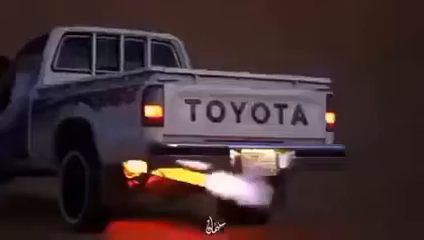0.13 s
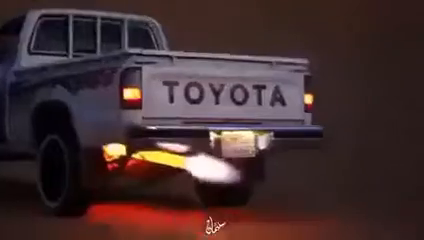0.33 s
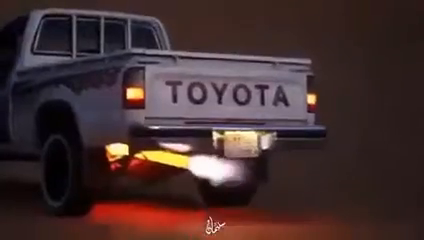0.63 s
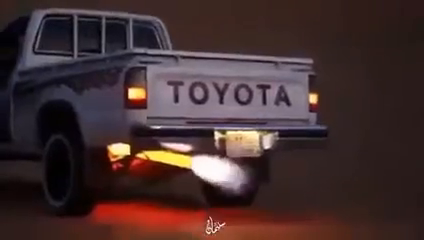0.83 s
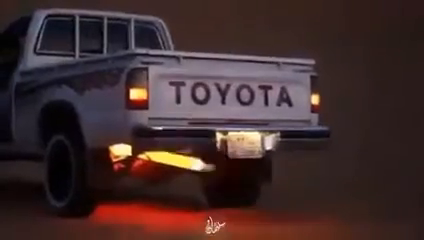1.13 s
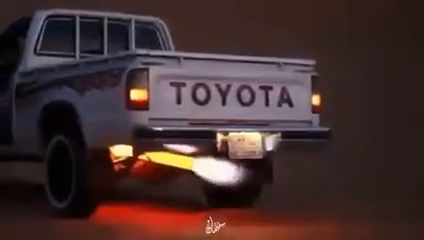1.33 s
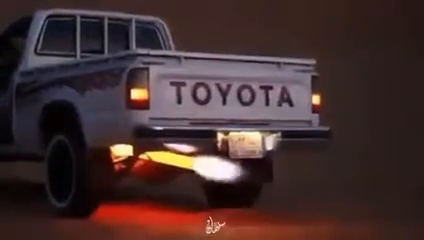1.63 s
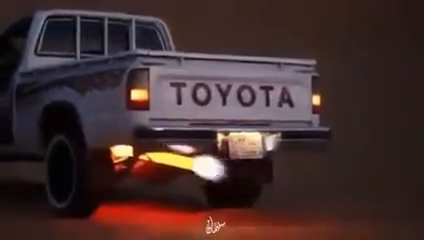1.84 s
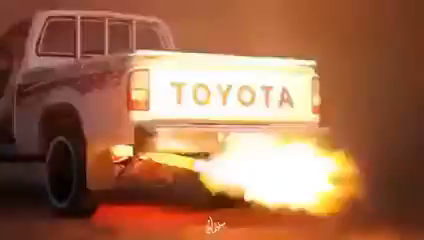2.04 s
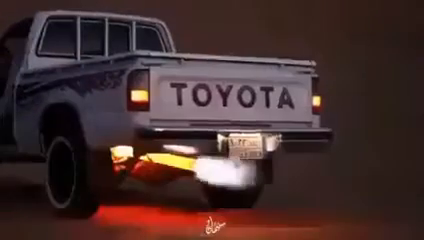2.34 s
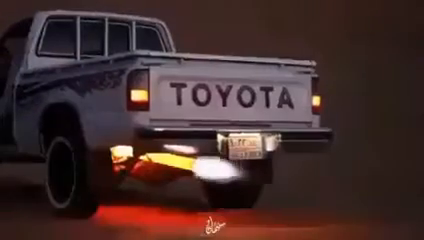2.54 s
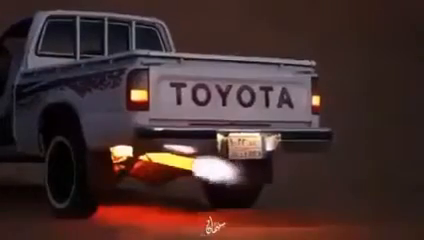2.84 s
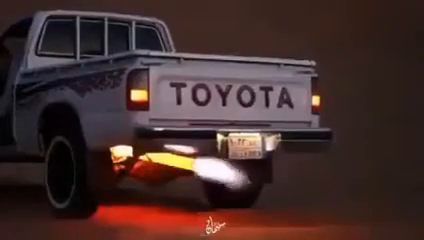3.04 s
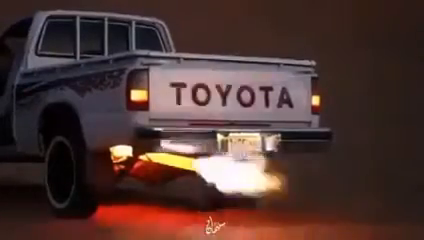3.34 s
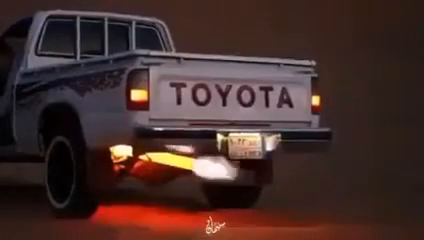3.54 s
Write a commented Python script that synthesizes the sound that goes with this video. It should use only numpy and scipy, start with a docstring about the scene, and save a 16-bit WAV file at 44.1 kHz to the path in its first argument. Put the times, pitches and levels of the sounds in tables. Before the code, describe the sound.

A pickup engine bounces off its rev limiter, cutting in abruptly at 0.2 s after silence. Hollow, pipe-ringing pops and sharp cracks come irregularly, roughly forty per second, over buzzing firings, sputtering hiss and low rumble. From 1.7 to 2.1 s a raspy flame howl slides down, with a short muffled burst at 2.0. Dense popping resumes, briefly thinning near 3.2, until 3.66. Close, outdoors, faint reflections, peaks slightly saturated.

```python
"""A pickup's four-cylinder engine bounces off its rev limiter outdoors: uneven firings ring the exhaust pipe.
Each firing adds a spit of turbulent gas, over a sputtering hiss that rises and falls and a crank hum.
Sharp pops of unburnt fuel ring the same pipe and crack; the engine dips just before each one.
Midway the tailpipe flame howls down in pitch, a modulated harmonic tone, and bursts in a puff of noise.
Filtered crank pulses add a rasp, low noise a rumble throughout; near echoes and a faint tail surround it all."""
import sys
import numpy as np
from scipy import signal
from scipy.fft import rfft, irfft
from scipy.io import wavfile
from scipy.ndimage import map_coordinates

SR = 44100
rng = np.random.default_rng(int(sys.argv[2]) if len(sys.argv) > 2 else 0)


def wav_out(sig):
    """Save sig, one row per channel (or a flat mono array), as 16-bit PCM at SR to the path in sys.argv[1]."""
    wavfile.write(sys.argv[1], SR, np.round(np.clip(np.atleast_2d(sig).T, -1, 1) * 32767).astype(np.int16))


N = 161847
T = np.arange(N) / SR


def amp(db):
    """Level law: decibels to a pressure gain."""
    return 10 ** (np.asarray(db) / 20)


def unit(x):
    """Normalisation to an effective (rms) value of 1."""
    return x / np.sqrt(np.mean(x ** 2) + 1e-20)


def curve(rows, axis=1):
    """Linear interpolation of one table column over time."""
    rows = np.array(rows)
    return np.interp(T, rows[:, 0], rows[:, axis])


def wander(hz):
    """Slow random fluctuation: noise under a Gaussian low-pass, rms 1."""
    hz_axis = np.fft.rfftfreq(N, 1 / SR)
    spectrum = rfft(rng.standard_normal(N))
    return unit(irfft(spectrum * np.exp(-(hz_axis / hz) ** 2), N))


def lowpass(x, hz):
    """Second-order low-pass: fast changes of pressure are smoothed."""
    return signal.sosfilt(signal.butter(2, hz, fs=SR, output="sos"), x)


def highpass(x, hz, order):
    """High-pass: slow changes of pressure are removed."""
    return signal.sosfilt(signal.butter(order, hz, "high", fs=SR, output="sos"), x)


def response(points, peaks=(), size=8192):
    """Minimum phase: the causal impulse response, of energy 1, of a spectrum with resonances."""
    hz = abs(np.fft.fftfreq(size, 1 / SR))
    point_hz, point_db = np.transpose(points)
    db = np.interp(np.log(hz + 1), np.log(point_hz + 1), point_db)
    for centre, width, lift in peaks:
        db = db + lift / (1 + (2 * (hz - centre) / width) ** 2)
    # the Hilbert transform of the log magnitude gives the phase
    log_spectrum = np.conj(signal.hilbert(np.log(amp(db))))
    h = np.fft.ifft(np.exp(log_spectrum)).real[:size // 2]
    return h / np.linalg.norm(h)


def through(x, h):
    """Convolution: a linear system answers every sample with its impulse response."""
    return signal.fftconvolve(x, h)[:N]


def coloured_noise(points):
    """Filtered white noise: a random source takes the given spectrum."""
    return through(rng.standard_normal(N), response(points))


def clicks(times, sizes):
    """Impulse train: one single-sample impulse at each time."""
    samples = np.round(np.asarray(times) * SR).astype(int)
    return np.bincount(np.clip(samples, 0, N), sizes, N + 1)[:N]


# near reflections from ground and bodywork: delay_s, gain
NEAR_ECHOES = [(.0051, 0.059), (.0073, 0.042)]
YARD_T60, YARD_DB = .25, -18  # decay time of the scattered tail (s), its level (dB)


def outdoors(x):
    """Reflection and scattering: discrete early echoes and an exponentially decaying tail."""
    onset = np.minimum(T / 0.0038, 1)
    tail = rng.standard_normal(N) * amp(-60 * T / YARD_T60) * onset
    tail = amp(YARD_DB) * tail / np.linalg.norm(tail)
    return x + through(x, clicks(*np.transpose(NEAR_ECHOES)) + tail)


# colour of the low exhaust rumble: frequency_hz, level_db
RUMBLE_COLOUR = [(20, -24), (50, -7.5), (90, 6), (160, 3.5), (260, 0.5), (600, -46.5), (3000, -75.5)]
# course of the rumble: time_s, level_db
RUMBLE_LEVEL = [(.22, -34.5), (.9, -28), (1.0, -18.5), (1.12, -34.5), (1.4, -27.5), (2.2, -29),
                (2.9, -29.5), (3.2, -31), (3.66, -29)]
RUMBLE_DB = -31


def rumble():
    """Random source: low exhaust noise of slowly varying level, heard throughout."""
    return amp(RUMBLE_DB) * unit(amp(curve(RUMBLE_LEVEL)) * coloured_noise(RUMBLE_COLOUR))


FIRING_HZ, CRANK_WANDER = 191.1, .0074  # mean firing rate (Hz), rms speed wander (fraction)


def crank_turns():
    """Phase accumulation: crankshaft turns at half the mean firing rate, the speed wandering."""
    return np.cumsum(FIRING_HZ / 2 * (1 + CRANK_WANDER * wander(12))) / SR


# course of the engine's rasp, louder around the howl: time_s, level_db
RASP_COURSE = [(.9, -56), (1.0, -42), (1.13, -32.5), (1.22, -66), (1.79, -40), (1.84, -31.5), (1.9, -29.5),
               (1.94, -46), (2.04, -31), (2.09, -39.5), (2.14, -29.5), (2.3, -39), (3.15, -45.5),
               (3.36, -47), (3.6, -39.5)]
# colour of the rasp: frequency_hz, level_db
RASP_COLOUR = [(300, -11), (600, 3.5), (850, -7), (1200, 10.5), (1450, 3), (1750, -35), (2300, -5.5),
               (3100, -7), (4500, -22), (10000, -34.5)]
RASP_NOISE, RASP_UNEVEN_DB = .35, 2.5  # noise per pulse train (rms ratio), rms pulse spread (dB)


def rasp(turns):
    """Periodic excitation: the engine rasps with one uneven, filtered pulse per crank turn, and noise."""
    beats = T[np.flatnonzero(np.diff(np.floor(turns)))]
    train = clicks(beats, amp(RASP_UNEVEN_DB * rng.standard_normal(len(beats))))
    pulses = unit(through(train, response(RASP_COLOUR)))
    noise = unit(coloured_noise(RASP_COLOUR))
    return amp(curve(RASP_COURSE)) * unit(pulses + RASP_NOISE * noise)


# course of the flame howl: time_s, mean pitch_hz, level_db, roughness (0-1)
HOWL_COURSE = [(1.72, 280, -38, .9), (1.78, 255, -25, .9), (1.83, 232, -21, .8), (1.9, 214, -19, .6),
               (1.935, 182, -20, .35), (1.975, 173, -15, .2), (2.04, 172, -18, .3), (2.1, 174, -23, .25),
               (2.14, 176, -42, .5)]
# second to fourth harmonic of the howl: level_db
OVERTONES = [-13.5, -19, -24.5]
HOWL_WAVER = .025  # rms pitch waver (fraction)
HOWL_THROB, HOWL_GRIT, HOWL_GRIT_HZ = .8, .55, 70  # crank modulation, random modulation, its band (Hz)


def howl(turns):
    """Modulated harmonic tone: the flame's pitch wavers while crank throb and random grit shake its level."""
    pitch = curve(HOWL_COURSE) * (1 + HOWL_WAVER * wander(89))
    phase = 2 * np.pi * np.cumsum(pitch) / SR
    tone = np.sin(phase)
    for k, db in enumerate(OVERTONES, 2):
        tone = tone + amp(db) * np.sin(k * phase)
    throb = HOWL_THROB * np.cos(2 * np.pi * turns)
    shake = curve(HOWL_COURSE, axis=3) * (throb + HOWL_GRIT * wander(HOWL_GRIT_HZ))
    sounding = (T > HOWL_COURSE[0][0]) * (T < HOWL_COURSE[-1][0])
    return unit(tone) * (1 + shake) * amp(curve(HOWL_COURSE, axis=2)) * sounding


# colour of the fireball: frequency_hz, level_db
FIREBALL_COLOUR = [(60, -26), (250, -7.5), (340, -10), (400, 1.5), (460, -12), (560, -24), (670, -7.5),
                   (800, -42), (3000, -44), (9000, -62)]
FIREBALL_S, FIREBALL_RISE_S, FIREBALL_FALL_S, FIREBALL_DB = 2.007, 0.0057, 0.034, -9


def fireball():
    """Transient noise: a burst that rises linearly and decays exponentially."""
    age = np.maximum(T - FIREBALL_S, 0)
    burst = np.minimum(age / FIREBALL_RISE_S, 1) * np.exp(-age / FIREBALL_FALL_S)
    return amp(FIREBALL_DB) * burst * unit(coloured_noise(FIREBALL_COLOUR))


# colour of the escaping gas: frequency_hz, level_db
GAS_COLOUR = [(200, -3), (500, 12.5), (800, 10.5), (1300, 5), (1750, -0.5), (2300, -2.5), (3000, -6),
              (4500, -11.5), (7000, -19), (10000, -26.5)]
PATCH_HZ, PATCH_S, PATCHY_DB = 385.6, .022, 3.5  # patch size (Hz, s), rms spread (dB)


def jet():
    """Turbulence: gas noise whose spectrum drifts in random patches of frequency and time."""
    hz, t, z = signal.stft(coloured_noise(GAS_COLOUR), SR, nperseg=512)
    field = rng.standard_normal((256, 1024))
    grid = np.meshgrid(hz / PATCH_HZ, t / PATCH_S, indexing="ij")
    patches = map_coordinates(field, grid, order=1, mode="wrap")
    return unit(signal.istft(z * amp(PATCHY_DB * unit(patches)), SR, nperseg=512)[1][:N])


def puffs(train, rise_s, fall_s, size=2048):
    """Amplitude modulation: gas noise swells into each impulse and decays exponentially after it."""
    t = np.arange(-size, size + 1) / SR
    shape = np.exp(-abs(t) / np.where(t < 0, rise_s, fall_s))
    return signal.fftconvolve(train, shape, "same") * jet()


# broad colour of a pressure pulse: frequency_hz, level_db
PULSE_COLOUR = [(25, -26.5), (55, -15), (95, -2.5), (200, 0), (330, 1.5), (480, 7), (800, -10), (1200, -8),
                (2000, -18), (4000, -26), (10000, -75.5)]
# resonances of the pipe before the heat shift: centre_hz, width_hz, lift_db
PIPE_MODES = [(150.7, 28, 10), (200, 16, -1), (248.4, 49, 11), (282.2, 29.2, 11.5), (380.6, 29, 8.5),
              (421.3, 64.5, 9.5), (573.3, 21.5, 10), (622, 56, 9.5), (760, 510, 2), (894, 96, 1.5),
              (1240, 490, -1.5)]
HEAT_SPREAD = 0.03  # largest pitch shift with the heat of a pulse (fraction)


def pipe(times, sizes, count=5):
    """Resonance: each pressure pulse rings the pipe at a pitch set by its own, randomly drawn heat."""
    heat = rng.integers(0, count, len(times))
    out = np.zeros(N)
    for k, shift in enumerate(1 + HEAT_SPREAD * np.linspace(-1, 1, count)):
        modes = [(hz * shift, width, lift) for hz, width, lift in PIPE_MODES]
        out += through(clicks(times, sizes * (heat == k)), response(PULSE_COLOUR, modes))
    return highpass(out, 15, 1)


# level of the pipe's low boom: time_s, level_db
BOOM_LEVEL = [(.24, 1.5), (.33, 0), (.4, 6), (.5, -4), (.62, 3), (.7, 5), (.87, -4), (.97, -1), (1.08, 4),
              (1.17, -8.5), (1.42, 3), (1.55, -2), (1.8, 0), (2.55, -0.5), (2.65, -0.5), (3.32, 1.5),
              (3.46, 0), (3.6, 3)]
# level of its main ring: time_s, level_db
RING_LEVEL = [(0.231, 1.5), (.4, -7), (.52, 4), (.7, 0), (.9, -2.5), (1.06, 5), (1.27, -5), (1.4, 0.5),
              (1.7, 1), (1.9, -4.5), (2.15, 5.5), (2.28, -0.5), (2.38, 4), (2.6, -3), (3.08, 2),
              (3.19, -5.5), (3.52, 3.5), (3.66, -6.5)]
# level of its upper bark: time_s, level_db
BARK_LEVEL = [(.42, 0), (.6, -2.5), (.76, 4.5), (.95, -2.5), (1.25, -3), (1.4, 1.5), (1.55, 0.5),
              (1.939, -5), (2.04, 1), (2.28, -1), (2.62, -1), (2.75, -1), (2.9, -1.5), (3.14, 3),
              (3.21, -7), (3.34, -5.5), (3.4, 3), (3.63, 0.5)]
BOOM_HZ, RING_HZ, BARK_HZ, RING_WIDTH_HZ = 225, 415, 610, 100  # band centres, Gaussian width


def shifting(x):
    """Modal balance: three resonance bands of the pipe swell and fade independently."""
    hz, spectrum = np.fft.rfftfreq(N, 1 / SR), rfft(x)
    for centre, level in ((BOOM_HZ, BOOM_LEVEL), (RING_HZ, RING_LEVEL), (BARK_HZ, BARK_LEVEL)):
        band = irfft(spectrum * np.exp(-((hz - centre) / RING_WIDTH_HZ) ** 2), N)
        x = x + (amp(curve(level)) - 1) * band
    return x


STEEPENING, CREST_LIMIT = .7, .33


def steepen(x):
    """Nonlinear distortion: loud waves grow pointed crests and flat troughs, up to a limit."""
    crests = (CREST_LIMIT * np.tanh(x / CREST_LIMIT)) ** 2
    return x + STEEPENING * highpass(crests, 300, 1)


# pops in the exhaust: start_s, relative thump level_db, relative crack level_db
POP_EVENTS = [(0.2189, -4.5, -24.5), (0.222, -14, -43), (0.2373, -12, -23.5), (0.2536, -8, -34),
              (0.2616, -7.5, -47), (0.2766, -37, -26), (0.291, -31, -23.5), (0.305, -22, -48),
              (0.334, -8, -18.5), (0.354, -35, -23.5), (0.375, -18, -30), (0.3959, -14, -21),
              (0.4583, -13, -31), (0.4903, -7, -27), (0.5123, -11.5, -24.5), (0.537, -8, -31),
              (0.607, -13, -24), (0.6278, -8, -23.5), (0.6792, -7, -33), (0.701, -6.5, -23.5),
              (0.7205, -9.5, -24.5), (0.7632, -9.5, -20), (0.7782, -17, -25), (0.7918, -11, -36),
              (0.815, -15, -23), (0.839, -7, -20), (0.859, -23, -20.5), (0.88, -37, -34),
              (0.9637, -10, -27), (0.978, -7.5, -34), (1.0007, -12, -41), (1.0743, -12, -32),
              (1.1552, -15, -27), (1.1988, -4, -21), (1.219, -4.5, -23.5), (1.2608, -1.5, -22.5),
              (1.28, -27, -24.5), (1.301, -3, -24), (1.313, -18, -26), (1.3325, -14, -28),
              (1.3552, -27, -26), (1.3751, -14, -20.5), (1.3978, -5, -21), (1.4502, -17, -25),
              (1.4716, -13, -21.5), (1.478, -14, -35), (1.493, -8, -28), (1.541, -43, -40),
              (1.564, -12.5, -26), (1.5867, -16, -31), (1.609, -15, -26), (1.6601, -12, -23),
              (1.6798, -11, -20.5), (1.732, -2.5, -33.5), (1.773, -7, -46), (1.8339, -16, -32),
              (1.8576, -11, -29), (1.8794, -7.5, -40), (1.89, -17, -32), (1.902, -11, -36),
              (2.012, -14, -50), (2.0265, -10, -30), (2.0379, -3, -23.5), (2.055, -10.5, -25.5),
              (2.117, -23, -22), (2.128, -11, -21), (2.139, -11, -40), (2.1502, -9, -59),
              (2.1587, -17, -39), (2.181, -21, -28), (2.2354, -7, -21.5), (2.2557, -9, -22),
              (2.275, -23, -24.5), (2.298, -32, -24), (2.3183, -11.5, -27), (2.3481, -8.5, -26.5),
              (2.3724, -5.5, -27), (2.4229, -7, -22.5), (2.464, -5, -22), (2.4742, -8.5, -29),
              (2.4934, -5.5, -41), (2.5268, -4.5, -27), (2.536, -4.5, -23.5), (2.553, -8, -27),
              (2.568, -13, -35), (2.5997, -1.5, -19), (2.6207, -1, -18.5), (2.6389, -5, -22.5),
              (2.6744, -35, -23.5), (2.6958, -24, -17.5), (2.718, -27, -25), (2.7327, -15, -26.5),
              (2.7687, -9, -27), (2.791, -10, -28.5), (2.8113, -12, -24.5), (2.8345, -5.5, -25),
              (2.8743, -11, -38), (2.8857, -5, -19.5), (2.906, -11, -21), (2.9131, -19, -33),
              (2.9246, -9, -33), (2.9575, -11, -34), (2.9757, -34, -24), (2.9987, -16, -28.5),
              (3.0149, -8.5, -29), (3.0406, -10, -22), (3.0638, -9.5, -22), (3.1172, -5.5, -19.5),
              (3.1369, -16, -19), (3.1614, -19, -39), (3.271, -5, -33), (3.3015, -11, -38),
              (3.3344, -15.5, -56), (3.3667, -7.5, -37), (3.3791, -6.5, -32), (3.386, -5, -19.5),
              (3.397, -9, -23.5), (3.403, -6.5, -41), (3.44, -21, -26.5), (3.459, -14, -29),
              (3.5148, -9.5, -25.5), (3.5241, -22, -28), (3.567, -9, -22), (3.6395, -4.5, -21),
              (3.6632, -48, -28)]
THUMP_DB, CRACK_DB, SNAP_DB, BLOWDOWN_DB = 15.5, 2.5, 11.5, -8.5
CRACK_RISE_S, CRACK_FALL_S, BLOWDOWN_S = 0.0018, 0.004, 0.036  # the blowdown gas trails after a pop
THUMP_RISE_S, SWELL_DB = 0.0018, -7.5  # lead and level of the burn before each pop
BRIGHT_DB, BRIGHT_FROM_HZ, BRIGHT_POWER = 18.5, 2430, 1.777  # the hardest cracks are the brightest


def pops():
    """Impulsive excitation: exploding fuel gives a swell, a ringing front, a crack and trailing gas."""
    s, thump_db, crack_db = np.transpose(POP_EVENTS)
    thump, crack = amp(thump_db + THUMP_DB), clicks(s, amp(crack_db))
    swell = lowpass(pipe(s - THUMP_RISE_S, amp(SWELL_DB) * thump), 700)
    gas = amp(CRACK_DB) * puffs(crack, CRACK_RISE_S, CRACK_FALL_S)
    gas += amp(BLOWDOWN_DB) * puffs(crack, CRACK_RISE_S, BLOWDOWN_S)
    hard_gas = puffs(crack ** BRIGHT_POWER, CRACK_RISE_S, CRACK_FALL_S)
    gas += amp(BRIGHT_DB) * highpass(hard_gas, BRIGHT_FROM_HZ, 2)
    snap = amp(SNAP_DB) * through(crack, response(GAS_COLOUR))
    return swell + pipe(s, thump) + gas + snap


LULL_DB, LULL_LEAD_S, LULL_HALF_S = 5, .006, .005  # depth for one hard pop, lead, Gaussian half length
LULL_CRACK_DB = -25  # crack level from which a pop counts as fully hard


def lull():
    """Gain modulation: a misfire dips the engine before each pop, less for the softer cracks."""
    hardness = [(s, min(1, amp(crack_db - LULL_CRACK_DB))) for s, _, crack_db in POP_EVENTS]
    t = np.arange(-1024, 1025) / SR
    dip = np.exp(-((t + LULL_LEAD_S) / LULL_HALF_S) ** 2)
    dips = signal.fftconvolve(clicks(*np.transpose(hardness)), dip, "same")
    return amp(-LULL_DB * dips)


# spark cuts of the limiter: centre_s, half_length_s, depth_db
SPARK_CUTS = [(0.327, 0.0058, 12.5), (0.344, 0.0048, 28), (0.827, 0.0037, 2.5), (1.191, 0.0048, 5),
              (1.25, 0.0066, 3.5), (1.76, 0.012, 3), (2.452, 0.0042, 13), (2.515, 0.0088, 8.5),
              (2.56, 0.0062, 14.5), (2.897, 0.0035, 12), (3.126, 0.0056, 8), (3.324, 0.0059, 12)]


def spark():
    """Gain gating: the exhaust passes at gain 1 while the spark is on and dips in each cut."""
    return amp(-sum(depth_db * np.exp(-((T - s) / half) ** 4) for s, half, depth_db in SPARK_CUTS))


# strength of each cylinder in firing order: level_db
CYLINDER_STRENGTH = [-4.5, -9, -5.5, -8]
# strength of the firings between the pops: time_s, level_db
FIRING_LOAD = [(0.42, -21), (0.65, -26), (0.8, -24.5), (1.23, -20.5), (1.68, -24), (1.82, -28.5),
               (2.05, -27.5), (2.84, -21), (2.98, -24.5), (3.13, -24), (3.36, -26), (3.49, -25.5),
               (3.62, -22.5)]
# level of the gas between the pops: time_s, level_db
GAS_FLOW = [(0.42, -33.5), (0.71, -32.5), (0.88, -42), (1.12, -34), (1.3, -38.5), (1.52, -33), (1.66, -39),
            (1.8, -40.5), (2.1, -41), (2.26, -36), (2.42, -38), (2.83, -37.5), (3.01, -39), (3.16, -41.5),
            (3.23, -52), (3.35, -52), (3.41, -43), (3.56, -34), (3.62, -38)]
# steady engine note, first to fourth harmonic of the crank: level_db
CRANK_HUM = [-44, -39, -43, -43.5]
SPEED_WANDER, UNEVEN_DB, JITTER_S = .03, 1, 0.001223  # rms speed (fraction), strength, timing
FIRING_DB, FIRING_TOP_HZ = 1.5, 1300  # firings are rounder than pops
SPIT_DB, SPIT_RISE_S, SPIT_FALL_S, HISS_DB = -3, 0.0017, 0.0015, 6
SPUTTER_HZ, SPUTTER_DB = 43.2, 2  # the limiter chops the gas flow
TICK_DB, TICK_SPREAD_DB = -6.5, 5.5  # the steep fronts of the firings crackle


def engine():
    """Quasi-periodic excitation: uneven firings ring the pipe and spit gas; the crank hums below."""
    turns = np.cumsum(FIRING_HZ * (1 + SPEED_WANDER * wander(6))) / SR
    at = np.flatnonzero(np.diff(np.floor(turns)))  # one firing per whole count
    strength, late = rng.standard_normal((len(at), 2)).T
    sputter = amp(SPUTTER_DB * np.clip(wander(SPUTTER_HZ), -3, 1))
    cylinder_db = np.resize(CYLINDER_STRENGTH, len(at))
    size = sputter[at] * amp(cylinder_db + UNEVEN_DB * np.clip(strength, -3, 1))
    times = T[at] + JITTER_S * late
    rounded = lowpass(pipe(times, size), FIRING_TOP_HZ)

    gas = amp(SPIT_DB) * unit(puffs(clicks(times, size), SPIT_RISE_S, SPIT_FALL_S))
    gas += amp(HISS_DB) * sputter * jet()
    ticks = size * amp(TICK_SPREAD_DB * np.clip(rng.standard_normal(len(at)), -2, 1))
    gas += amp(TICK_DB) * unit(through(clicks(times, ticks), response(GAS_COLOUR)))

    phase = 2 * np.pi * crank_turns()
    hum = sum(amp(db) * unit(np.sin(k * phase)) for k, db in enumerate(CRANK_HUM, 1))
    return amp(FIRING_DB + curve(FIRING_LOAD)) * unit(rounded) + amp(curve(GAS_FLOW)) * gas + hum


def scene():
    """Superposition: engine, pops and flame add, steepen together and spread into the open air."""
    exhaust = spark() * shifting(lull() * engine() + pops())
    turns = crank_turns()
    flame = howl(turns) + fireball()
    return outdoors(steepen(exhaust + rasp(turns) + flame + rumble()))[None]


START_S, EDGE_HZ = .2025, 10200  # the sound cuts in, upper band edge


def record(dry):
    """Saturation and band limiting: after the cut-in, peaks are rounded off and the top is removed."""
    x = dry * np.clip((T - START_S) / 0.001, 0, 1)
    x = x / (1 + (x / .68) ** 6) ** (1 / 6)
    band = signal.firwin(255, EDGE_HZ, window=("kaiser", 8), fs=SR)
    return signal.oaconvolve(x, band[None], "same")


dry = scene()
out = record(dry)
wav_out(out)
```